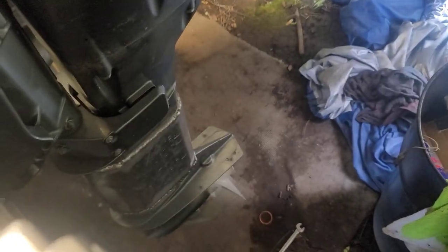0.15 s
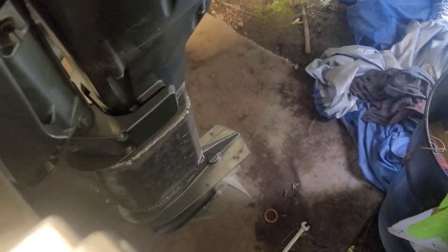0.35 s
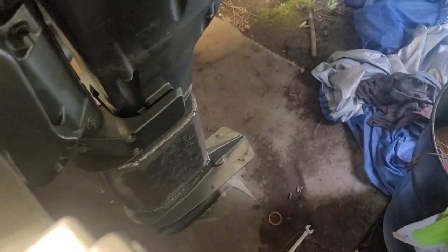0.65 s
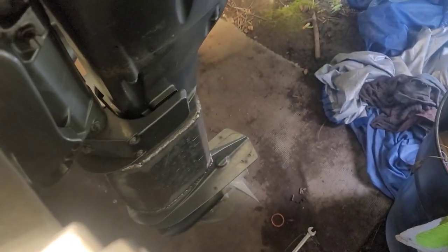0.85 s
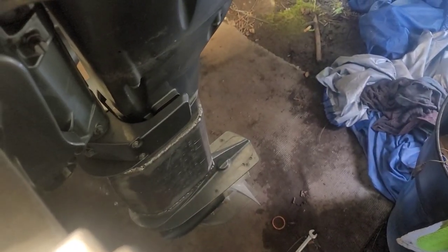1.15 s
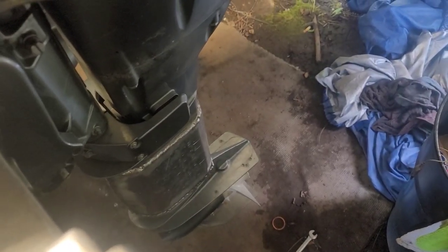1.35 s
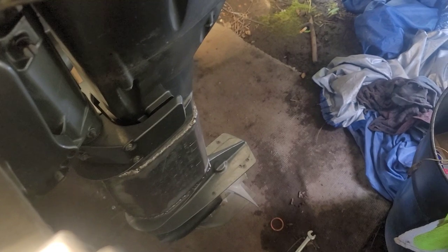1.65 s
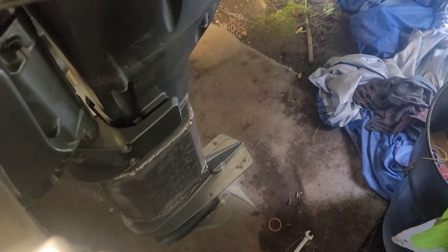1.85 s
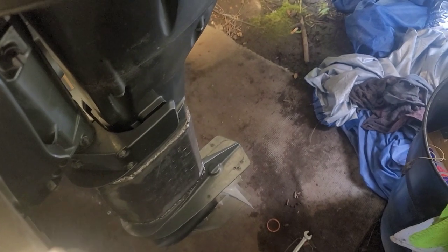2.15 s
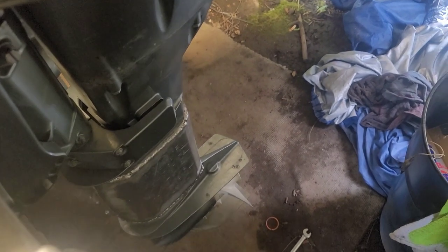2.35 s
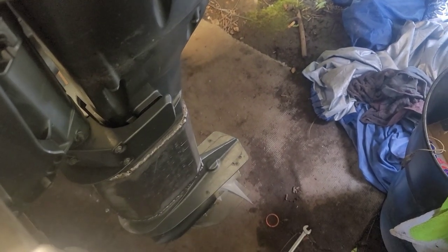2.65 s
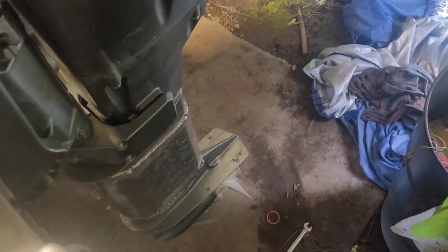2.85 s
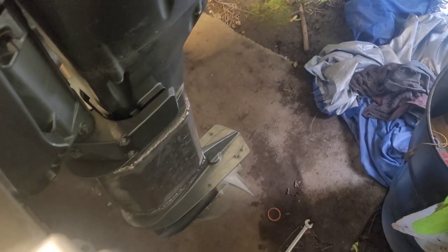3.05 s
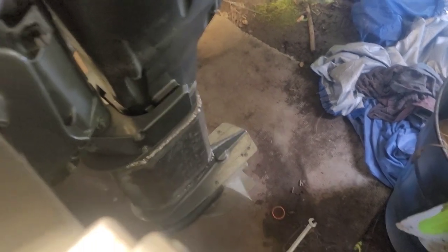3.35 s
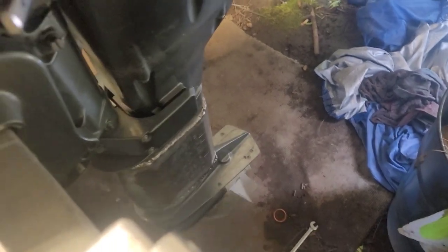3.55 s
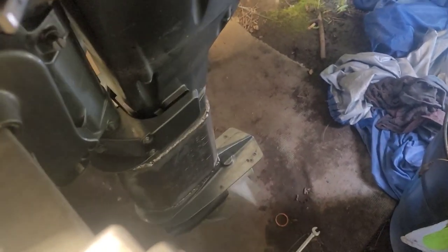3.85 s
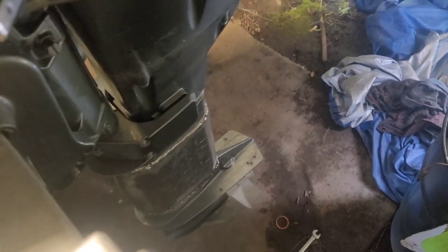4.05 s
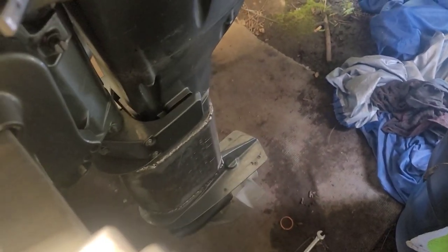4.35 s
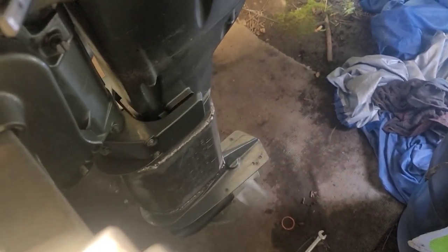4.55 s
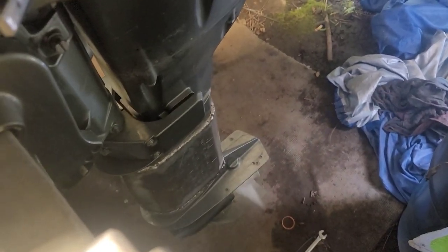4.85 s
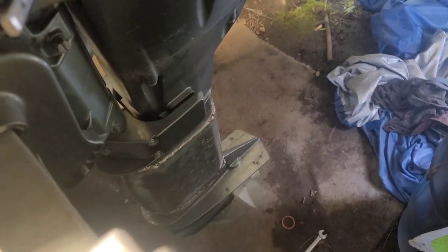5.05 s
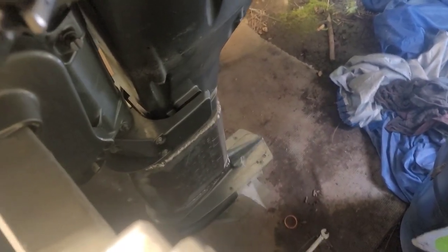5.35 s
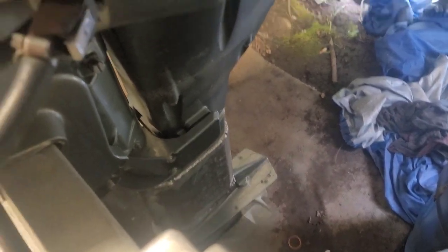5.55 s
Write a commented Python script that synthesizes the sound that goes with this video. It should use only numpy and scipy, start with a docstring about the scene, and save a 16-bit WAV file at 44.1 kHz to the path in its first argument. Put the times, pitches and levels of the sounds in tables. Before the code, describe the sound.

A small outboard motor cranks with a grinding whine, catches, speeds up and settles into a stumbling idle, after faint bird chirps.

```python
"""An open workshop: a four-cylinder four-stroke outboard is started on its stand; birds call outside.
The starter clunks in, its teeth whining and grinding on the flywheel over six chuffing compressions.
The engine catches, speeds up, then sinks to an idle in which one cylinder, then another, keeps missing.
Each firing thumps in the exhaust, knocks in the leg, rattles the casing and spits spray."""
import sys
import numpy as np
from scipy import signal
from scipy.fft import rfft, irfft, next_fast_len
from scipy.io import wavfile

SR = 44100
rng = np.random.default_rng(int(sys.argv[2]) if len(sys.argv) > 2 else 0)


def dump(signal):
    """Clip the signal to [-1, 1] and save it as 16-bit WAV at the path in sys.argv[1]."""
    limited = np.clip(np.atleast_2d(signal).T, -1, 1)
    pcm = np.round(limited * 32767).astype(np.int16)
    wavfile.write(sys.argv[1], SR, pcm)


N = 250929
TIME_S = np.arange(N) / SR
FFT_SIZE = next_fast_len(N + SR // 4)

# Engine speed from the catch on. Each row: time in seconds, firings per second.
FIRING_RATE = [(2.87, 13.12), (3.17, 33.92), (3.35, 41.54), (3.6, 46.05), (4.0, 48.66), (4.35, 48.65),
               (4.85, 46.26), (5.25, 46.68), (5.69, 42.89)]
# Cylinders in firing order. Each row: thump, knock and spray in dB.
CYLINDER_DB = [(2.7, -0.5, 4), (1, -3.5, 7.5), (2.05, 1.5, 3.5), (1.9, -4, 7.5)]
# Misfires. Each row: start in seconds, end in seconds, cylinder index.
MISFIRE_SPELLS = [(4.25, 4.6, 3), (4.68, 5.16, 1), (5.2, 5.7, 1), (5.62, 5.7, 2)]
# Offsets to thump, knock and spray.
SURGE_DB, SURGE_S = (1.5, 2, 11.5), 0.23  # early firings burn rich
HALF_CATCH_DB = (-1, -26, -7)  # first firing only
MISS_DB, MISS_ONSET_S = (-27, -24, -8), 0.11
# Exhaust air columns. Each row: frequency in Hz, level in dB, T60 in seconds, delay in seconds.
EXHAUST_MODES = [(72.6, -26, 0.3, 0.0034), (101, -9, 0.02, 0.00075), (218, -18.3, 0.12, 0.0041),
                 (267, -16, 0.15, 0.0027), (296, -22.5, 0.22, 0.0068)]
# Swell of exhaust ring and gear hum during run-up. Each row: time in seconds, gain in dB.
FLARE_DB = [(2.87, -3.5), (3.25, 2), (3.8, -0.5), (5.69, -0.8)]
# Deep gas shove of the first firings. Each row: time in seconds, gain in dB.
SHOVE_DB = [(2.87, 9), (3.16, 11.5), (3.28, -8), (3.5, -40)]
# Expelled gas. Each row: frequency in Hz, relative density in dB.
CHUFF_SPECTRUM = [(25, -12), (60, -5), (90, 8.5), (140, -0.5), (300, -12), (800, -51.5)]
# Gas bubbling through the leg. Each row: frequency in Hz, relative density in dB.
BURBLE_SPECTRUM = [(40, -28.5), (75, 3.5), (180, -4), (270, 7.5), (310, 3.5), (350, -2.5), (700, -38)]
# Hollow knock of the leg. Each row: frequency in Hz, level in dB, swell in seconds, delay in seconds.
KNOCK_MODES = [(461, -20, 0.0023, 0.003), (553, -29.5, 0.0025, 0.007), (737, -38.5, 0.0039, 0.0035),
               (890, -19, 0.0021, 0.0036), (1265, -26.5, 0.0045, 0.0053), (1342, -23, 0.0027, 0.0036),
               (1613, -33, 0.0033, 0.004), (1910, -31, 0.0044, 0.0053)]
# Loose metal. Each row: frequency in Hz, level in dB, T60 in seconds.
PING_MODES = [(3530, -40, 0.067), (3560, -53, 0.048), (3760, -42.5, 0.052), (4880, -38.5, 0.081),
              (5380, -36.5, 0.05), (6110, -46, 0.047)]
# Rattles during the stumbling idle. Each row: start in seconds, relative level in dB.
RATTLE_RUNS = [(4.98, -1), (5.075, 2), (5.245, -6), (5.33, -8), (5.598, 2)]
# Water spray. Each row: frequency in Hz, relative density in dB.
SPRAY_SPECTRUM = [(1100, 10), (1600, 12), (2500, 6), (4000, 5), (6000, 1), (7800, -8), (11500, -7.5),
                  (14000, -4), (16000, -5)]
# Valve gear. Each row: frequency in Hz, relative density in dB.
CLATTER_SPECTRUM = [(280, 16), (420, 25), (700, 1), (1200, -38), (1800, -21), (2300, 3.5), (3200, 9),
                    (4200, 8), (7000, -46.5)]
# Casing resonances. Each row: frequency in Hz, width in Hz, lift in dB.
CASING_MODES = [(487, 81, 7.5), (680.5, 18, 12), (885, 56, 13), (1280, 120, 17), (1578, 59, 11.5),
                (1940, 29, 1), (2280, 62, 6.5), (2820, 220, 4), (3490, 93, -8), (4810, 120, 12.5),
                (5164, 110, 16)]
# Running gear. Each row: multiple of the firing rate, level in dB.
GEAR_ORDERS = [(10, -45.5), (11, -37.5), (12, -37), (13, -44.5), (19, -38.5), (28, -41)]

ENGAGE_S, STROKE_S, RELEASE_S = 2.044, 0.094, 0.12  # starter; stroke at full cranking speed
# Tooth load into and over a compression: position and width as stroke fractions, gain in dB.
PUSH, SLACK = (0.66, 0.1, 7.6), (0.93, 0.09, -18)
# Starter whine. Each row: multiple of the tooth rate, relative level in dB.
WHINE_HARMONICS = [(1, -25), (2, 12), (3, 6), (4, -5)]
# Grinding teeth. Each row: frequency in Hz, relative density in dB.
GRIND_SPECTRUM = [(110, -4), (260, 8.5), (420, 2), (750, -0.5), (1100, -7), (1650, 2), (2800, 3),
                  (3400, -2.5), (4500, -13.5), (6000, -11.5), (9000, -32.5)]
# Dry tooth scrape. Each row: frequency in Hz, relative density in dB.
RASP_SPECTRUM = [(1000, -21), (4000, 15), (6500, 3), (9000, -4), (13000, -8), (16000, -18)]
# Pinion engaging, snatching, thrown out. Each row: time in seconds, level in dB.
PINION_CLANKS = [(2.046, -5.5), (2.064, -4), (2.245, -9), (2.375, -7.5), (2.952, -20), (2.985, -10.5)]
# Starter taking load. Each row: start and length in seconds, first, middle, last pitch in Hz, level in dB.
STARTER_GROANS = [(2.062, 0.033, 188.5, 223.6, 213, -11.5), (2.055, 0.033, 450, 380, 330, -7.5),
                  (2.112, 0.039, 1240, 1238, 1250, -12), (2.15, 0.063, 380.4, 381, 319.6, -14),
                  (2.182, 0.04, 296, 247.5, 222, -9), (2.243, 0.047, 193.5, 163, 129, -17.5),
                  (2.295, 0.05, 1656, 1665, 1550, -20), (2.335, 0.032, 1280, 1315, 1270, -19)]

# Bird notes. Each row: start and length in seconds, first, middle, last pitch in Hz, level in dB.
BIRD_NOTES = [(0, 0.022, 2860, 3000, 3400, -51.5), (.85, 0.077, 3000, 3100, 3190, -44)]
# Buzzy slurs. Each row: start and length in seconds, first, middle, last pitch in Hz, level in dB.
BIRD_SLURS = [(.905, 0.064, 4500, 3240, 2540, -41), (.98, 0.16, 3250, 3670, 3880, -45),
              (1.09, 0.16, 3910, 3995, 4080, -43), (1.635, 0.068, 3800, 3110, 2590, -42.5)]
# One bird's syllable, a steep fall and a short rise.
# Each row: offset and length in seconds, first, middle, last pitch in Hz, relative level in dB.
BIRD_SYLLABLE = [(0, .1, 6900, 5500, 3700, 0), (.105, .025, 2650, 2880, 3030, -7),
                 (.118, .045, 3020, 3120, 3160, 0)]
# Its repeats. Each row: start in seconds, level in dB.
SYLLABLE_REPEATS = [(1.298, -48), (1.472, -48), (1.643, -49), (1.819, -48), (1.999, -47)]
# Far drone. Each row: frequency in Hz, level in dB.
DRONE_TONES = [(66.5, -58.5), (133, -60.5), (198, -63)]
# Outdoor air. Each row: frequency in Hz, relative density in dB.
AIR_SPECTRUM = [(25, -27), (65, -2), (120, -15.5), (300, -17), (900, -24), (1600, -32), (4000, -38.5),
                (7000, -49.5), (8000, -64)]
# Rustle. Each row: frequency in Hz, relative density in dB.
RUSTLE_SPECTRUM = [(150, 4), (310, 12), (600, -12), (3500, -7), (6000, 5), (8000, -22)]

# Workshop reverb. Each row: frequency in Hz, T60 in seconds.
SHOP_T60_S = [(100, 0.45), (500, 0.6), (6000, 0.31), (15000, 0.0065)]
# Outdoor reverb. Each row: frequency in Hz, T60 in seconds.
YARD_T60_S = [(2000, 0.44), (7000, 0.48)]
# Stereo likeness. Each row: frequency in Hz, left-right correlation.
CORRELATION = [(100, 0.92), (250, 0.87), (500, -0.53), (1000, 0.027), (2000, -0.37), (6000, -0.055)]
# Stereo phase. Each row: frequency in Hz, lead of left over right in radians.
LEFT_LEAD_RAD = [(130, 0.5), (200, -0.06), (280, 0.89), (430, 2), (900, 1.1), (2000, 2)]
# Stereo balance. Each row: frequency in Hz, left minus right in dB.
BALANCE_DB = [(140, 0.5), (270, -3), (500, 3.5), (900, 1.5), (1700, -2.5), (4500, 0), (6500, 2), (8200, 9),
              (13000, 4), (16000, -3)]


def engine():
    """Firings drive the exhaust, leg, loose metal, spray and valve gear; returns boom, knocks, metal."""
    times_s, (thump_db, knock_db, spray_db) = firings()
    metal = pings(times_s, spray_db) + spray(times_s, spray_db) + clatter(times_s, knock_db) + rattles()
    return exhaust(times_s, thump_db), leg_knocks(times_s, knock_db), metal


def firing_count():
    """Running count of firings: the integral of engine speed."""
    return np.cumsum(np.interp(TIME_S, *np.transpose(FIRING_RATE), left=0)) / SR


def firings(scatter_db=(0.4, 0.7, 2.2), jitter_s=0.00005):
    """Firing times and their thump, knock and spray levels in dB."""
    fired = firing_count()
    number = np.arange(int(fired[-1]) + 1)
    times_s = np.interp(number, fired[fired > 0], TIME_S[fired > 0])
    cylinder = number % len(CYLINDER_DB)
    surge = np.exp(-(times_s - times_s[0]) / SURGE_S)
    db = np.array(CYLINDER_DB)[cylinder] + np.outer(surge, SURGE_DB)
    db[0] += HALF_CATCH_DB
    db += rng.standard_normal(db.shape) * scatter_db
    for start_s, end_s, dead in MISFIRE_SPELLS:
        loss = np.clip((times_s - start_s) / MISS_ONSET_S, 0, 1) * (times_s < end_s)
        db += np.outer(loss * (cylinder == dead), MISS_DB)
    return times_s + jitter_s * rng.standard_normal(len(times_s)), db.T


def exhaust(times_s, db, thump_db=-8.5, burble_db=-24, dip_s=0.00068, swell_s=0.00075, ahead_s=0.0029):
    """Each firing is a small pressure swell, then a sharp dip; the leg rings and gas burbles through."""
    lead = SR // 80
    t = TIME_S[:SR // 4] - lead / SR
    pulse = 0.4 * np.exp(-.5 * ((t + ahead_s) / swell_s) ** 2) - np.exp(-.5 * (t / dip_s) ** 2)
    train = impulses(times_s, db)
    thumps = amp(thump_db) * signal.oaconvolve(train, pulse)[lead:][:N]
    rings = gain_curve(FLARE_DB) * resonate(train, EXHAUST_MODES)
    shoves = colour(-gain_curve(SHOVE_DB) * train, CHUFF_SPECTRUM)
    ragged = gain_curve([(2.98, 7), (3.2, -4)])  # the first firings burn raggedly
    burble = colour(ragged * puffs(train, rise_s=0.00044, decay_s=0.081), BURBLE_SPECTRUM)
    return shoves + phase_pan(thumps + gain_curve(FLARE_DB) * rings) + amp(burble_db) * burble


def leg_knocks(times_s, db, ahead_s=0.005, rebound=0.51, rebound_s=0.006676):
    """A knock and a weaker rebound per firing; the leg's modes swell quickly, then die."""
    early_s = times_s - ahead_s
    hits = impulses(early_s, db) + rebound * impulses(early_s + rebound_s, db)
    response = 0
    for hz, mode_db, swell_s, delay_s in KNOCK_MODES:
        t = np.maximum(TIME_S[:SR // 4] - delay_s, 0)
        envelope = t / swell_s * np.exp(1 - t / swell_s)
        response += amp(mode_db) * envelope * np.sin(2 * np.pi * hz * t)
    return phase_pan(signal.oaconvolve(hits, response)[:N])


def clatter(times_s, db, rattle_db=-31, valve_db=-34):
    """Valve gear noise and a rattle per firing, through the casing's resonances."""
    running = np.clip((TIME_S - FIRING_RATE[0][0]) / 0.03, 0, 1)
    rattle = amp(rattle_db) * puffs(impulses(times_s, db), rise_s=0.00045, decay_s=0.028)
    valves = running * amp(valve_db + 2 * wander(67)) * noise()
    return colour(valves + rattle, CLATTER_SPECTRUM, CASING_MODES)


def spray(times_s, db, gain_db=-24):
    """Each firing spits a hiss of water."""
    flutter = amp(2 * wander(540))
    spits = puffs(impulses(times_s - .004, db), rise_s=0.0038, decay_s=0.014)
    return amp(gain_db) * colour(flutter * spits, SPRAY_SPECTRUM, small_modes())


def pings(times_s, db, scatter_db=(-17.5, 5)):
    """Firings strike each mode of the loose metal with random strength."""
    return sum(resonate(impulses(times_s, db + rng.uniform(*scatter_db, len(times_s))), [mode])
               for mode in PING_MODES)


def rattles(gain_db=8.0, gap_s=0.007, count=5):
    """A loose part bounces in short runs, ringing its three lowest modes."""
    start_s, db = np.transpose(RATTLE_RUNS)
    bounces_s = start_s[:, None] + gap_s * (np.arange(count) + rng.random((len(start_s), count)))
    return resonate(impulses(bounces_s.ravel(), np.repeat(db + gain_db, count)), PING_MODES[:3])


def gear_hum(rise_s=0.42):
    """Clean tones that glide with the crankshaft, loudest as it gathers speed."""
    tones = partials(GEAR_ORDERS, firing_count(), waver_db=2, waver_hz=3)
    return tones * np.clip((TIME_S - FIRING_RATE[0][0]) / rise_s, 0, 1) * gain_curve(FLARE_DB)


def compressions(extra_s=0.097, kept=0.42):
    """Engagement time, then top dead centres; strokes shorten as the starter spins up."""
    lengths_s = STROKE_S + extra_s * kept ** np.arange(10)
    return ENGAGE_S + np.append(0, np.cumsum(lengths_s))


def starter(mesh_hz=888, swing=0.15, fastest_at=0.43, jitter=0.035):
    """The pinion drives the flywheel, slowing and growing louder against each compression."""
    tops_s = compressions()
    stroke = np.interp(TIME_S, tops_s, np.arange(len(tops_s))) % 1
    slowness = np.interp(TIME_S, (tops_s[:-1] + tops_s[1:]) / 2, np.diff(tops_s)) / STROKE_S
    # a slow flywheel has little momentum, so its speed swings more
    ripple = swing * slowness ** 1.8 * np.cos(2 * np.pi * (stroke - fastest_at))
    tooth_hz = mesh_hz * (1 + ripple) / slowness
    cycles = np.cumsum(tooth_hz * (1 + jitter * wander(210))) / SR
    load_db = bump(stroke, *PUSH) + bump(stroke, *SLACK)
    release = np.clip(1 - (TIME_S - FIRING_RATE[0][0]) / RELEASE_S, 0, 1) ** 2
    drive = (TIME_S > ENGAGE_S) * release * amp(-4 * (slowness - 1.5))
    onset = np.interp(TIME_S, tops_s[:2] + STROKE_S, [0, 1]) ** .5  # too slow to sing at first
    whine = onset * drive * tooth_whine(cycles, tooth_hz, load_db)
    groans = glides(STARTER_GROANS, waver=0.04, waver_hz=200)
    grind = tooth_grind(cycles, drive, load_db, groans)
    return whine + grind + tooth_rasp(drive, load_db, slowness) + phase_pan(groans)


def tooth_whine(cycles, tooth_hz, load_db, whine_db=-29.5, sing_db=-32, casing_hz=890, width_hz=120):
    """Mesh harmonics; the casing sings as the tooth rate sweeps through its resonance."""
    teeth = unit_rms(partials(WHINE_HARMONICS, cycles, waver_db=4, waver_hz=31.3))
    in_tune = resonance(tooth_hz, casing_hz, width_hz)
    sing = in_tune * amp(sing_db + 0.88 * load_db) * np.sin(2 * np.pi * cycles)
    return amp(whine_db + 1.72 * load_db) * phase_pan(teeth) + sing


def tooth_grind(cycles, drive, load_db, groans, bite_db=-7, judder_db=8, friction_db=-22):
    """Clanks, tooth bites, friction and one slip per groan cycle excite the casing."""
    clanks = puffs(impulses(*np.transpose(PINION_CLANKS)), rise_s=0.0028, decay_s=0.014)
    force = drive * amp(0.55 * load_db)
    bites = amp(bite_db) * force * strikes(np.sin(2 * np.pi * cycles))
    judder = amp(judder_db) * abs(signal.hilbert(groans)) * strikes(groans)
    friction = force * amp(friction_db + 2.95 * wander(140)) * noise()
    return colour(friction + clanks + phase_pan(bites + judder), GRIND_SPECTRUM, CASING_MODES[:-1])


def tooth_rasp(drive, load_db, slowness, gain_db=-37):
    """Dry scrape of the teeth, rising with load and speed."""
    scrape = drive * amp(gain_db + 0.4 * load_db - 5 * (slowness - 3)) * noise()
    return colour(scrape, RASP_SPECTRUM, small_modes() + CASING_MODES[-1:])


def chuffs(chuff_db=9, gasp_db=-9, boom_hz=100, count=6):
    """After each compression the unfired cylinder chuffs out its air and the leg booms."""
    tops_s = compressions()[1:]
    slowness = np.diff(tops_s)[:count] / STROKE_S
    valves = impulses(tops_s[:count] + 0.016 * slowness ** 2, -3 * (slowness - 1))
    gasps = puffs(valves, rise_s=0.004, decay_s=0.016)
    boom = signal.oaconvolve(valves, ring(boom_hz, db=-11, t60_s=0.076, delay_s=0.0044))[:N]
    return colour(-amp(chuff_db) * valves + amp(gasp_db) * gasps, CHUFF_SPECTRUM) + boom


def backlash(slap_db=-28.5, after_s=0.0051, count=6):
    """Past each compression the flywheel runs ahead and the teeth slap across their play."""
    slaps = impulses(compressions()[1:][:count] + after_s, np.full(count, slap_db))
    return colour(puffs(slaps, rise_s=0.0013, decay_s=0.17), SPRAY_SPECTRUM)


def birds():
    """Short notes, a repeated syllable and buzzy slurs, all gliding whistles."""
    phrase = [(start_s + offset_s, *shape, db + note_db)
              for start_s, db in SYLLABLE_REPEATS for offset_s, *shape, note_db in BIRD_SYLLABLE]
    song = glides(BIRD_NOTES, waver=0.008, waver_hz=242)
    song += glides(phrase, waver=0.023, waver_hz=397, db_per_octave=-21.5)
    return song + glides(BIRD_SLURS, waver=0.018, waver_hz=400, buzz=0.045)


def outdoors(direct_db=-5, echo_db=-1, rustle_db=-51, air_db=-51):
    """Birds among echoing trees, a far wavering drone, a brief rustle and a low rumble."""
    song = birds()
    warped_s = np.cumsum(1 + 0.02 * wander(2.3)) / SR
    drone = partials(DRONE_TONES, warped_s, waver_db=7.4, waver_hz=8.7)
    rustle = colour(puffs(impulses([.73], [rustle_db]), rise_s=0.04, decay_s=0.071), RUSTLE_SPECTRUM)
    calls = amp(direct_db) * song + amp(echo_db) * reverb(song, YARD_T60_S)
    return calls + drone + rustle + amp(air_db) * colour(noise(), AIR_SPECTRUM)


def amp(db):
    """Decibels to gain."""
    return 10 ** (np.asarray(db) / 20)


def gain_curve(points):
    """Gain per sample from (seconds, dB) points."""
    return amp(np.interp(TIME_S, *np.transpose(points)))


def unit_rms(x):
    """Scales to rms 1."""
    return x / np.sqrt(np.mean(x ** 2) + 1e-20)


def at_hz(points, hz):
    """Interpolates on a log-frequency axis."""
    points_hz, value = np.transpose(points)
    return np.interp(np.log(hz + 1), np.log(points_hz + 1), value)


def bump(stroke, at, width, db):
    """Gaussian rise or dip in dB, repeated every stroke."""
    away = (stroke - at + .5) % 1 - .5
    return db * np.exp(-.5 * (away / width) ** 2)


def add(mix, start_s, sound):
    """Mixes a sound in place."""
    part = mix[max(round(start_s * SR), 0):][:len(sound)]
    part += sound[:len(part)]


def wander(rate_hz):
    """Low-passed random drift of rms 1."""
    hz = np.fft.rfftfreq(N, 1 / SR)
    return unit_rms(irfft(rfft(rng.standard_normal(N)) / (1 + (hz / rate_hz) ** 4), N))


def noise():
    """Stereo white noise."""
    return spread(*rng.standard_normal((2, N)))


def impulses(times_s, db):
    """One impulse per time and level."""
    train = np.zeros(N)
    for start_s, gain in zip(times_s, amp(db)):
        add(train, start_s, np.array([gain]))
    return train


def strikes(wave, scatter_db=3):
    """One uneven impact per cycle of a vibration."""
    return (np.diff(np.sign(wave), prepend=0) > 1) * amp(scatter_db * rng.standard_normal(N))


def puffs(train, rise_s, decay_s):
    """One noise burst per impulse."""
    t = TIME_S[:SR // 4]
    envelope = (1 - np.exp(-t / rise_s)) * np.exp(-t / decay_s)
    power = signal.oaconvolve(train ** 2, envelope ** 2)[:N]
    return np.sqrt(abs(power)) * noise()


def partials(rows, base, waver_db, waver_hz):
    """Sines from (k, dB) rows, at phase k * base in cycles, each wavering in level."""
    return sum(amp(db + waver_db * wander(waver_hz)) * np.sin(2 * np.pi * (k * base + rng.random()))
               for k, db in rows)


def glides(rows, waver, waver_hz, db_per_octave=0, buzz=0, buzz_hz=130):
    """Tones that swell and fade through three pitches; waver and buzz are fractions of the pitch."""
    out = np.zeros(N)
    drift = 1 + waver * wander(waver_hz) + buzz * np.sin(2 * np.pi * buzz_hz * TIME_S)
    for start_s, length_s, first_hz, middle_hz, last_hz, db in rows:
        u = np.linspace(0, 1, int(length_s * SR))
        hz = np.interp(u, [0, .5, 1], [first_hz, middle_hz, last_hz])
        level = amp(db + db_per_octave * np.log2(hz / middle_hz)) * np.sqrt(abs(np.sin(np.pi * u)))
        cycles = np.cumsum(hz * drift[int(start_s * SR):][:len(u)]) / SR
        add(out, start_s, level * np.sin(2 * np.pi * cycles))
    return out


def ring(hz, db, t60_s, delay_s=0):
    """One delayed, decaying mode."""
    t = np.maximum(TIME_S[:SR // 4] - delay_s, 0)
    return amp(db - 60 * t / t60_s) * np.sin(2 * np.pi * hz * t)


def resonate(train, modes):
    """Impulses ring a set of modes."""
    return signal.oaconvolve(train, sum(ring(*mode) for mode in modes))[:N]


def resonance(hz, centre_hz, width_hz):
    """Resonance curve of peak 1."""
    return 1 / (1 + (2 * (hz - centre_hz) / width_hz) ** 2)


def small_modes(count=30, width_hz=130, mean_lift_db=5, low_hz=5600, high_hz=14500):
    """Small, high resonances of the metal parts, placed at random."""
    place, size = rng.random((count, 2)).T
    centres_hz = low_hz + (high_hz - low_hz) * (np.arange(count) + place) / count
    return [(hz, width_hz, db) for hz, db in zip(centres_hz, mean_lift_db * (.5 + size))]


def colour(x, spectrum, modes=(), size=8192):
    """Minimum-phase filter of energy 1: a broad spectrum plus resonances."""
    hz = abs(np.fft.fftfreq(size, 1 / SR))
    db = at_hz(spectrum, hz) + sum(lift_db * resonance(hz, *band) for *band, lift_db in modes)
    log_response = np.conj(signal.hilbert(np.log(amp(db))))
    taps = np.fft.ifft(np.exp(log_response)).real[:size // 2]
    return signal.oaconvolve(np.atleast_2d(x), taps[None] / np.linalg.norm(taps), axes=1)[:, :N]


def spread(a, b):
    """Two unrelated signals become a stereo pair, alike in the bass and wide above."""
    alike = np.clip(at_hz(CORRELATION, np.fft.rfftfreq(FFT_SIZE, 1 / SR)), -1, 1)
    mid = rfft(a, FFT_SIZE) * np.sqrt((1 + alike) / 2)
    side = rfft(b, FFT_SIZE) * np.sqrt((1 - alike) / 2)
    return irfft(np.array([mid + side, mid - side]), FFT_SIZE)[:, :N]


def phase_pan(x):
    """One source arrives left and right out of step."""
    turn = np.exp(.5j * at_hz(LEFT_LEAD_RAD, np.fft.rfftfreq(FFT_SIZE, 1 / SR)))
    return irfft(rfft(x, FFT_SIZE) * np.array([turn, 1 / turn]), FFT_SIZE)[:, :N]


def reverb(x, t60_table, gap_samples=20):
    """Sparse reflections of random sign, each band decaying at its own rate."""
    taps = np.zeros((2, SR))
    slots = np.arange(SR // 300, SR - gap_samples, gap_samples)
    arrivals = slots + rng.integers(0, gap_samples, (2, len(slots)))
    np.put_along_axis(taps, arrivals, rng.choice([-1., 1.], arrivals.shape), 1)
    hz, t, bands = signal.stft(taps, SR, nperseg=256)
    decay = amp(-60 * t / at_hz(t60_table, hz)[:, None])
    tail = signal.istft(bands * decay, SR, nperseg=256)[1]
    return spread(*signal.fftconvolve(np.atleast_2d(x), tail / np.linalg.norm(tail[0]), axes=1)[:, :N])


def scene(boom_wet_db=-19, knock_wet_db=-13, metal_wet_db=-5, cranking_wet_db=-12):
    """Motor, workshop echo and the outdoors."""
    boom, knocks, metal = engine()
    cranking = starter() + chuffs() + backlash()
    send = amp(boom_wet_db) * boom + amp(knock_wet_db) * knocks
    send += amp(metal_wet_db) * metal + amp(cranking_wet_db) * cranking
    room = reverb(send, SHOP_T60_S)
    return boom + knocks + gear_hum() + metal + cranking + room + outdoors()


def record(dry, low_cut_hz=38, high_cut_hz=16100):
    """Left-right colouring, bass cut, full-scale limit, band limit."""
    hz = np.fft.rfftfreq(FFT_SIZE, 1 / SR)
    lean_db = at_hz(BALANCE_DB, hz) / 2
    low_cut = hz ** 4 / np.sqrt(hz ** 8 + low_cut_hz ** 8)
    shaped = irfft(rfft(dry, FFT_SIZE) * low_cut * amp([lean_db, -lean_db]), FFT_SIZE)[:, :N]
    low_pass = signal.firwin(511, high_cut_hz, window=("kaiser", 9), fs=SR)
    return signal.oaconvolve(np.clip(shaped, -1, 1), low_pass[None], "same")


dry = scene()
out = record(dry)
dump(out)
```